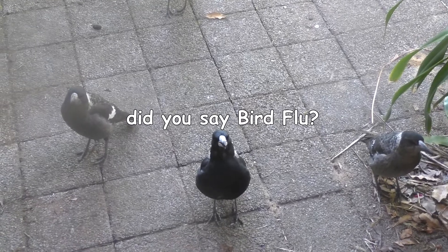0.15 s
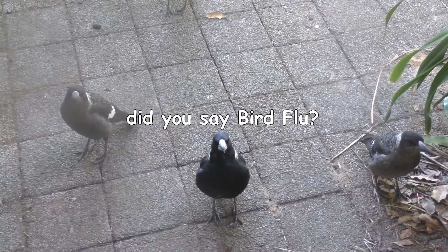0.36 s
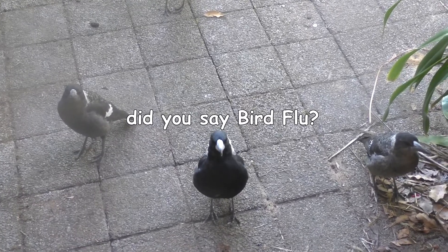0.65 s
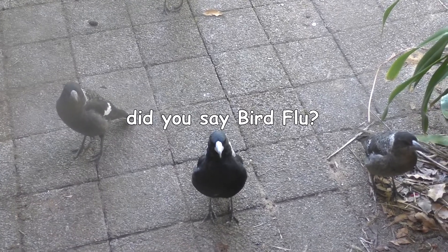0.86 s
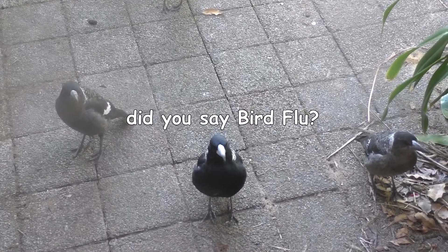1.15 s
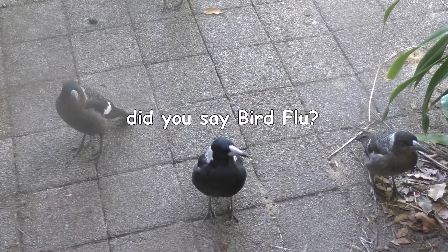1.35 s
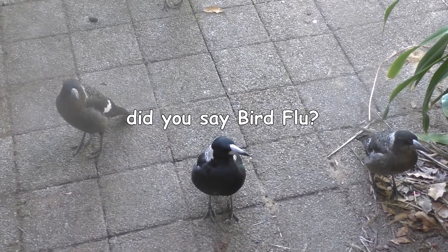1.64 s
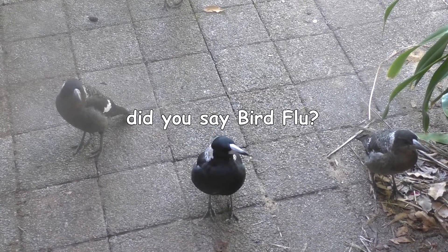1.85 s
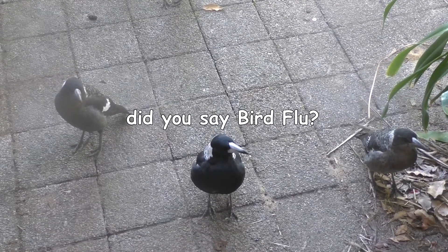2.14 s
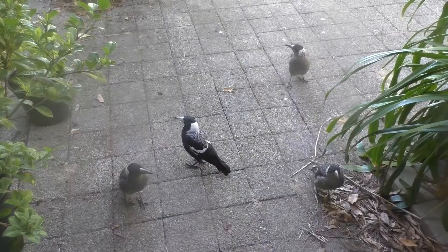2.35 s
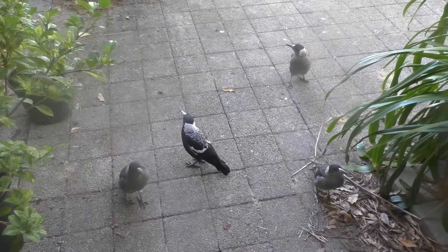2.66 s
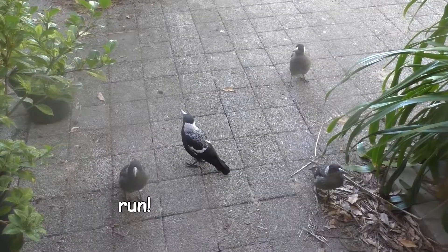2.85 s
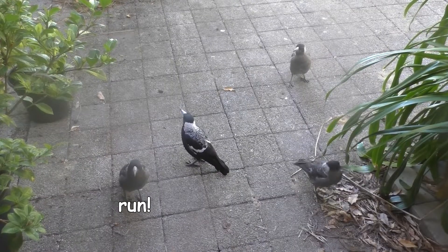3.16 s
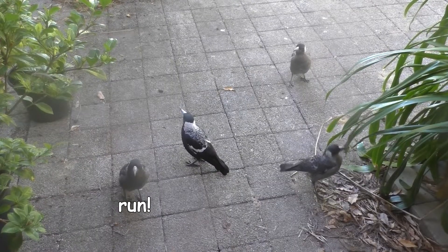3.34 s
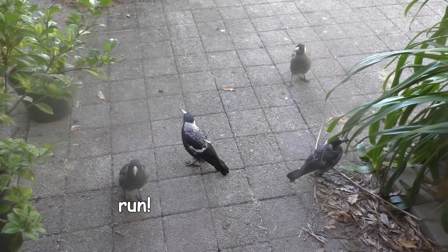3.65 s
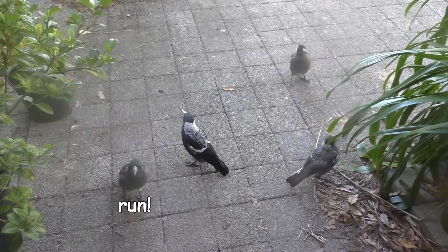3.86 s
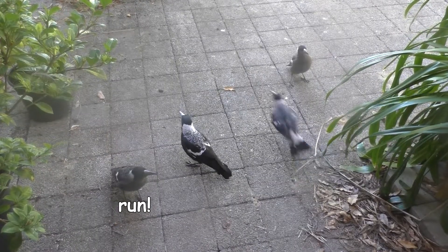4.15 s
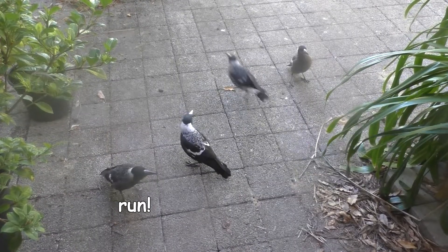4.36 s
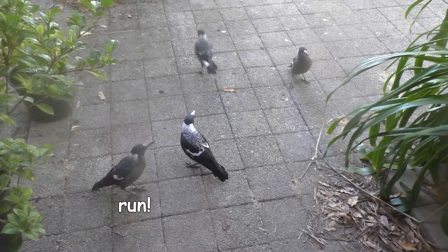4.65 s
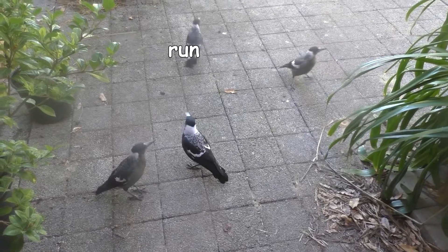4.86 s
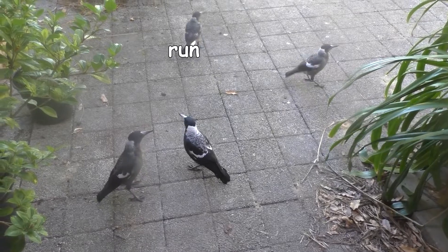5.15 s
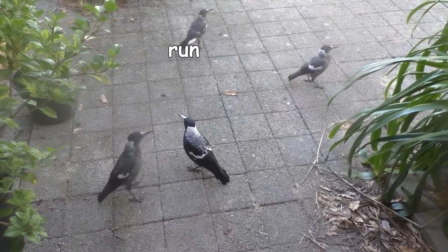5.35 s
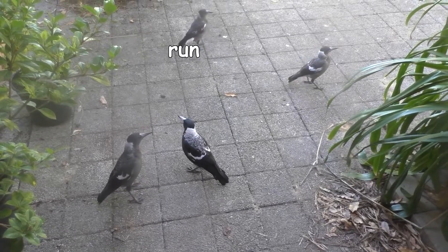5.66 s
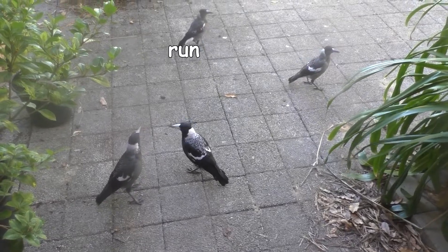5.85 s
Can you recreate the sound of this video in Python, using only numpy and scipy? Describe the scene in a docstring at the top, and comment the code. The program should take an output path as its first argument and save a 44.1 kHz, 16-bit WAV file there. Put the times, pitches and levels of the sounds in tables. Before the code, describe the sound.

Close magpie warbling and one harsh squawk give way to a steady engine rumble, with rustling leaves and fluttering wings.

```python
"""Magpies on a garden path

One magpie warbles a falling phrase, its two voices beating against each other so the notes flutter.
A harsh squawk follows, forced through an open beak. A young bird scrambles out of dry leaves and flaps
off across the pavers. Small birds whistle far off, and the garden walls echo the calls. A vehicle engine
drones nearby over distant traffic and a soft hiss; all three turn abruptly louder at 2.3 s."""
import sys
import numpy as np
from scipy import signal
from scipy.fft import rfft, irfft, next_fast_len
from scipy.io import wavfile
from scipy.ndimage import uniform_filter1d, map_coordinates

SR = 44100
rng = np.random.default_rng(int(sys.argv[2]) if len(sys.argv) > 2 else 0)


def transcribe(u):
    """Save the signal u as a 16-bit wav file named by the first command-line argument.

    u: samples, shape (n,) or (channels, n), limited to [-1, 1]; the rate is SR.
    q: integer samples, one column per channel.
    """
    v = np.clip(np.atleast_2d(u).T, -1, 1)
    q = np.round(v * 32767).astype(np.int16)
    wavfile.write(sys.argv[1], SR, q)


N = 264776
TIME = np.arange(N) / SR

# Six shapes of the throat and beak, each ringing at its own set of frequencies (resonances).
# Each row: frequency in Hz, half width in Hz, relative strength in dB.
HIGH_THROAT = [(2110, 250, -9.5), (2930, 160, -6.5), (3780, 160, -8.5), (4430, 260, 2), (5850, 150, -22),
               (7400, 92, -22), (8360, 250, -10), (10000, 560, -13), (11130, 320, -15.5), (13800, 490, -20)]
ROUND_THROAT = [(2017, 110, -17.5), (2940, 130, -15), (3600, 72, 1.5), (4960, 160, -8.5), (5610, 200, -16),
                (7400, 470, -24), (8570, 190, -13), (9580, 300, -12), (11300, 380, -16),
                (14500, 600, -28.5)]
SOFT_THROAT = [(2480, 150, -4), (4700, 380, -3), (8900, 330, -4), (12300, 480, -4), (15100, 300, -9)]
OPEN_THROAT = [(2070, 48, -5), (3170, 140, -7.5), (3700, 110, -5), (4226, 112, -16), (5150, 140, 0),
               (7254, 84, -14.5), (8350, 410, -17), (9405, 130, -5.5), (10020, 250, -10),
               (11280, 220, -5.5), (15450, 130, -18)]
MID_THROAT = [(1767, 77, -6), (2720, 127, -12), (3260, 90, -2), (3600, 130, -2.5), (5120, 200, -11),
              (7200, 340, -11), (9360, 280, -7), (11500, 460, -2.5), (12700, 220, -7), (14020, 400, -14)]
LOW_THROAT = [(1710, 85, -5), (2640, 98, -8.5), (3290, 75, 0.5), (3560, 60, -1), (6240, 70, -4),
              (8870, 170, 0.5), (10900, 130, -5), (13200, 153, -10)]
# The throat shape for each note, before the throat relaxes.
NOTE_THROATS = [HIGH_THROAT, HIGH_THROAT, ROUND_THROAT, ROUND_THROAT, SOFT_THROAT, OPEN_THROAT, MID_THROAT,
                MID_THROAT, LOW_THROAT, LOW_THROAT]
# How fast each note's resonances slide, as a share of their frequency per second.
THROAT_GLIDES = [.3, -0.26, -.6, -.4, -.3, 0.083, 0.45, -.2, -.2, -.2]
# The notes of the warble. Each row: start, crest and end in seconds; pitch in Hz at those three times;
# the whistle's crest level, rise and fall in dB; the same three for the rasp; beats per second at start
# and end; second voice's strength (0-1) at the three times; whether it lies above (1) or below (-1)
# the first; share of air noise in the rasp (0-1).
WARBLE_NOTES = [ (0, 0.042, .062, 1438, 1382, 1376, -12, 2.3, 3, -40, 11, 3, 134.3, 95.8, .15, 0.86, 1, 1, 0.73),
                (0.057, .074, .213, 1398, 1398, 1344, -18.5, 1, 22.4, -41, 3, 9.2, 68.5, 72.6, 0.91, 1, 1, 1, .8),
                (0.21, 0.263, .295, 959, 952, 953, -14.5, 14, 12, -37.5, 7.5, 10, 105.3, 108, 0.202, .19, 0.22, 1, 0.5),
                (0.293, 0.306, .332, 1020, 1043, 1066, -24.5, 2, 27, -49, 1, 19, 66.14, 75.8, 0.63, 0.77, .5, 1, .5),
                (0.486, 0.537, 0.5958, 898, 764, 673, -27.5, 22.5, 16.5, -54, 10, 11, 100.5, 48, 0.93, 0.43, 0.53, 1, 0.51),
                (.604, 0.653, 0.7056, 1009, 1015, 1020, -27.5, 12, 9.8, -37, 23, 9.9, 91.5, 102, .94, .6, 0.045, -1, 0.36),
                (0.703, .718, .735, 786, 805, 826, -33, 12, 11, -41.5, 7.3, 2, 124.6, 167, 0.8, .75, 0.52, -1, .6),
                (.731, 0.776, .909, 896.5, 881, 728, -27, 6.4, 5.7, -40, 4.1, 13, 92.1, 78.6, 0.35, .5, .9, -1, 0.56),
                (0.903, 0.916, .964, 711, 690, 666, -38, 2, 9.3, -55, 1.05, 2.9, 71, 65.5, .6, 0.42, 0.55, -1, 0.28),
                (0.958, 0.995, 1.075, 718, 702, 626, -35, 10.8, 25, -60.5, 1.94, 19, 79.3, 63.95, 0.72, 0.77, 0.94, -1, 0.48)]


def warble():
    """Clear notes step down in pitch: each swells to a crest and fades while its beating settles."""
    relax_s, sag_per_s = 0.769, 0.198  # late in the phrase the throat relaxes and its resonances sink
    phrase = np.zeros(N)
    for note, shape, glide in zip(WARBLE_NOTES, NOTE_THROATS, THROAT_GLIDES):
        times, pitches, strengths = note[:3], note[3:6], note[14:17]
        crest_db, rise_db, fall_db, rasp_crest_db, rasp_rise_db, rasp_fall_db = note[6:12]
        start_beat_hz, end_beat_hz = note[12:14]
        side, air_share = note[17:]
        start, crest, end = times

        def throat(x, t):
            """The note's own throat shape blends into the low one as the bird relaxes."""
            blend = np.pi / 2 * ramp(relax_s, 0.065, t)
            sag = 1 - sag_per_s * np.maximum(t - relax_s, 0)
            tense, low = [resonate(x, rows, scale, wander=0.0094, flicker_db=3, leak_db=-37, steep=1.18)
                          for rows, scale in ((shape, 1 + glide * (t - crest)), (LOW_THROAT, sag))]
            return np.cos(blend) * tense + np.sin(blend) * low

        t = span(start, end)
        rise_left = (1 - ramp(start, crest - start, t)) ** 1.7
        fallen = ramp(crest, end - crest, t)
        unsettled = (1 - ramp(start, end - start, t)) ** 1.5
        phrase += syrinx(
            t, np.interp(t, times, pitches), throat,
            beat_hz=end_beat_hz + (start_beat_hz - end_beat_hz) * unsettled,
            second_voice=np.interp(t, times, strengths), side=side,
            whistle_db=crest_db - rise_db * rise_left - fall_db * fallen ** 1.63,
            rasp_db=rasp_crest_db - rasp_rise_db * rise_left - rasp_fall_db * fallen ** 2.2,
            multiples=np.arange(2, 20), air_share=air_share,
            jitter=0.013, slip=0.91, smear=0.05, pinch=0.75, rasp_flutter=0.18)
    return phrase


# Resonances of the wide-open beak. Each row: frequency in Hz, half width in Hz, relative strength in dB.
OPEN_BEAK = [(1400, 250, 5), (1770, 68, 0), (2110, 140, 3), (2410, 125, 5), (3360, 160, -5), (4120, 149, 0),
             (4400, 100, -2), (5440, 270, 2.5), (6250, 360, -7), (7920, 300, 0), (10100, 400, -13),
             (11240, 400, -5.5)]
# The squawk scoops up, wavers and drops away. Each row: time in seconds, pitch in Hz.
SQUAWK_PITCH = [(1.894, 1131), (1.91, 1278), (1.95, 1400), (2.05, 1364), (2.105, 1405), (2.16, 1330),
                (2.2, 1400), (2.252, 1129)]
# Changes of effort. Each row: middle and half length in seconds, dB added to the whistle and to the rasp.
SQUAWK_PUSHES = [(1.925, .025, 2.5, 1), (2.1, .018, 4.5, 2.5), (2.16, .03, 0, -5), (2.207, .018, 5, -1.5)]


def squawk():
    """The voice, forced hard through an open beak, splits into rough tones a quarter of its pitch apart."""
    t = span(1.894, 2.252)

    def swell(attack_s, release_s):
        return ramp(t[0], attack_s, t) * (1 - ramp(t[-1] - release_s, release_s, t))

    def beak(x, t):
        follow_pitch = (pitch / np.median(pitch)) ** 0.3
        return resonate(x, OPEN_BEAK, follow_pitch, wander=0.021, flicker_db=1, leak_db=-23, steep=1.7)

    pitch = over_time(SQUAWK_PITCH, t)
    whistle_db = -40 + swell(0.5, 0.5)
    rasp_db = -51.5 + 13 * swell(0.014, 0.045)
    for middle, half_s, more_whistle_db, more_rasp_db in SQUAWK_PUSHES:
        whistle_db += more_whistle_db * bump(middle, half_s, t)
        rasp_db += more_rasp_db * bump(middle, half_s, t)
    force = swell(0.0292, 0.0292)
    return syrinx(t, pitch, beak, beat_hz=74, second_voice=0.95 * np.sqrt(force), side=1,
                  whistle_db=whistle_db, rasp_db=rasp_db, multiples=np.arange(3, 38) / 4, air_share=0.35,
                  jitter=0.04, slip=1.3, smear=0.3, pinch=0.7, rasp_flutter=0.12)


def syrinx(t, pitch, throat, beat_hz, second_voice, side, whistle_db, rasp_db, multiples, air_share,
           jitter, slip, smear, pinch, rasp_flutter):
    """A bird's voice box: two voices beat as a whistle; overtones and air rasp through the throat."""
    first, size = round(t[0] * SR), len(t)
    depth = second_voice * amp(1.18 * wobble(70, size))
    beat = side * 2 * np.pi * np.cumsum(beat_hz * (1 + 0.08 * wobble(50, size))) / SR
    pair = (1 - depth * np.exp(1j * beat)) / np.sqrt(1 + depth ** 2)
    # strong beats pinch into separate pulses of uneven size
    pulses = unit(np.abs(pair) ** (1 + pinch * depth ** 2)) * amp(1.76 * wobble(112.1, size))
    # the two voices lie either side of the pitch; deep beats let the phase slip
    hz = pitch * (1 + jitter * wobble(450, size)) - side * beat_hz * depth / (1 + depth)
    phase = 2 * np.pi * np.cumsum(hz) / SR + slip * depth * wobble(80.1, size)
    cycle = np.unwrap(np.angle(pair * np.exp(1j * phase)))
    whistle = np.sqrt(2) * pulses * np.sin(cycle)
    # every overtone swells and wavers on its own; the high ones waver most
    overtones = unit(sum(np.cos(k * cycle + smear * k * wobble(260, size)) * amp(3 * wobble(50, size))
                         for k in multiples))
    air = unit(rng.standard_normal(size) * (1 + 0.5 * np.cos(cycle)))
    buzz = np.sqrt(1 - air_share) * overtones + np.sqrt(air_share) * air
    rasp = throat(buzz, t) * unit(pulses ** rasp_flutter)
    fade = np.clip(np.minimum(t - t[0], t[-1] - t) / 0.004, 0, 1)
    voice = fade * (amp(whistle_db) * whistle + amp(rasp_db) * rasp)
    return np.pad(voice, (first, N - first - size))


def resonate(x, resonances, scale, wander, flicker_db, leak_db, steep):
    """A throat boosts sound near its wavering resonances and lets a little leak between them."""
    hz, seconds, spectrum = signal.stft(x, SR, nperseg=512, noverlap=448)
    hz = hz[:, None]
    frames = np.minimum(np.round(seconds * SR).astype(int), len(x) - 1)
    drift = lambda: wobble(45.8, len(x))[frames]
    gain = amp(leak_db) * (hz > 900) / (1 + (hz / 13000) ** 6)
    for ring_hz, width, db in resonances:
        centre = ring_hz * scale[frames] * (1 + wander * drift())
        gain = gain + amp(db + flicker_db * drift()) / (1 + ((hz - centre) / width) ** 2) ** steep
    return unit(signal.istft(spectrum * gain, SR, nperseg=512, noverlap=448)[1][:len(x)])


# The tone colours of feathers and of dry leaves. Each row: frequency in Hz, relative level in dB.
FEATHER_COLOUR = [(500, -45), (900, 0), (1400, 6), (2400, 6), (5000, 7), (7000, 3.5), (10000, 2.5),
                  (12500, -15), (15600, -33.5)]
LEAF_COLOUR = [(2000, -36), (5000, -8.5), (9000, 13.5), (13000, 10.5), (15800, -0.5)]
# The young bird's bursts of movement. Each row: peak time in seconds, seconds to rise 20 dB,
# seconds to fall 20 dB, feather level in dB, leaf level in dB.
FLURRIES = [(3.51, 0.36, 0.44, -61, -49), (3.62, 0.073, 0.32, -47.5, -58),
            (3.925, 0.37, 0.55, -37.5, -48.5), (4.12, 0.21, 0.23, -42, -41.5), (4.32, 0.16, 0.24, -44, -69),
            (4.56, 0.49, 2.4, -46.5, -58), (5.765, 0.141, 0.55, -42, -70)]
# Leaves snapping underfoot. Each row: start in seconds, level in dB, seconds to fade 60 dB,
# frequency in Hz below which the snap is weakened.
LEAF_SNAPS = [(3.2988, -32, 0.02, 10000), (3.357, -38, .012, 9000), (3.3854, -38.5, .04, 8000),
              (3.449, -38, .06, 9000), (3.5047, -30, .034, 7500), (3.603, -35.5, 0.076, 8000),
              (3.922, -33, .05, 7000), (4.09, -30, 0.023, 7000), (4.119, -32, .04, 6000),
              (4.146, -29.5, .025, 9000), (4.303, -35, .018, 11000)]


def scramble():
    """Feathers swish and dry leaves snap and crackle as a bird takes off."""
    def crackle(size):
        return coloured(rng.standard_normal(size) * amp(3.2 * wobble(1500, size)), LEAF_COLOUR)

    wing_gain, leaf_gain = np.zeros(N), np.zeros(N)
    for peak, rise, fall, feathers_db, leaves_db in FLURRIES:
        shape_db = -20 * np.maximum((peak - TIME) / rise, (TIME - peak) / fall)
        wing_gain = np.hypot(wing_gain, amp(feathers_db + shape_db))
        leaf_gain = np.hypot(leaf_gain, amp(leaves_db + shape_db))
    swish = wing_gain * amp(1.6 * wobble(25)) * rush(FEATHER_COLOUR, patchy_db=3)
    leaves = leaf_gain * amp(1.3 * wobble(90)) * crackle(N)
    age = TIME[:SR // 10]
    attack = 1 - np.exp(-age / 0.00077)
    for start, db, fade_s, low_hz in LEAF_SNAPS:
        snap = unit(filtered(crackle(len(age)), lambda hz: hz ** 4 / (hz ** 4 + low_hz ** 4)))
        leaves[round(start * SR):][:len(age)] += attack * amp(db - 60 * age / fade_s) * snap
    return swish + leaves


LOUDER_S = 2.302  # when the drone and the background step up in level
# How fast the engine runs. Each row: time in seconds, working cycles per second.
ENGINE_SPEED = [(1, 35.5), (2.3, 34.6), (2.5, 35), (2.8, 36), (3.1, 37.5), (3.45, 37.8), (3.9, 37.1),
                (4.3, 36.4), (4.66, 36), (5.3, 35.9), (6, 36)]
# The exhaust's tones. Each row: multiple of the engine speed, relative level in dB before and after the
# step up, dB added (after it) for each cycle per second above cruising speed.
EXHAUST_TONES = [(3, -16.5, -14.5, 2.5), (4, -15.5, -7.5, 0.64), (5, -34, -3, -1.27), (7, -16.5, -15.5, 3),
                 (8, -14.5, -12, -1)]
# The strongest tone sinks away twice. Each row: middle and half length in seconds, drop in dB.
BOOM_DIPS = [(2.55, .45, 6), (4.23, .14, 14)]
# The rumble's tone colour before and after the step up. Each row: frequency in Hz, relative level in dB.
RUMBLE_BEFORE = [(12, -75.5), (20, -45), (48, -8.5), (75, -14.5), (104, -1.5), (182, 0), (286, -3.5),
                 (392, -7), (492, -26), (600, -30), (780, -63), (1320, -120)]
RUMBLE_AFTER = [(15, -60), (25, -25), (54, -23.5), (112, -7), (162, -2.5), (226, -6), (265, -3),
                (286, -6.5), (370, -13.5), (435, -38), (480, -71), (620, -72.5), (1060, -120)]


def engine():
    """Exhaust tones follow the engine's speed over a lumpy rumble; it pulls, then settles."""
    cruise_hz, boom_multiple = 36.02, 5
    speed, after = over_time(ENGINE_SPEED), step_up()
    pull = after * (speed - cruise_hz)
    surge_db = 4.2 * after * np.exp(-np.abs(TIME - LOUDER_S) / 0.22)  # loudest right at the step up
    level_db = background_db(before_db=-39, after_db=-32) + 0.5 * pull + surge_db
    dip_db = sum(db * bump(middle, half_s) for middle, half_s, db in BOOM_DIPS)
    cycle = 2 * np.pi * np.cumsum(speed) / SR
    tones = np.zeros(N)
    for multiple, before_db, after_db, pull_db in EXHAUST_TONES:
        db = before_db + (after_db - before_db) * after + pull_db * pull
        gain = amp(db - dip_db * (multiple == boom_multiple) + 1.2 * wobble(6.4))
        phase = multiple * cycle + 0.34 * wobble(11) + rng.uniform(0, 2 * np.pi)
        tones += gain * np.sqrt(2) * np.sin(phase)
    rumble = after * amp(-4) * rush(RUMBLE_AFTER, patchy_db=3)
    rumble += (1 - after) * amp(-3) * rush(RUMBLE_BEFORE, patchy_db=2)
    return amp(level_db) * (tones + rumble * (1 + 0.24 * np.cos(cycle)))


def thump():
    """A soft low thump as the background suddenly gets louder."""
    age = np.maximum(TIME - LOUDER_S, 0)
    return -amp(-35 - 60 * age / 0.057) * np.sin(2 * np.pi * 45 * age)


# Small birds' calls. Each row: start and length in seconds, first and last pitch in Hz, level in dB,
# waver as a share of the pitch.
CHIRPS = [(1.321, 0.15, 5850, 6230, -57.5, 0.082), (1.437, 0.234, 4310, 4430, -54.5, 0.037),
          (3.706, 0.08, 1362, 1364, -50.5, 0.028), (3.947, 0.068, 1354, 1368, -48.5, 0.0325),
          (4.617, 0.14, 3158, 3190, -50, 0.0118)]


def small_birds():
    """Faint whistles from elsewhere in the garden, made hoarse by a fast waver in pitch."""
    song = np.zeros(N)
    for start, length, start_hz, end_hz, db, waver in CHIRPS:
        progress = ramp(start, length)
        pitch = (start_hz + progress * (end_hz - start_hz)) * (1 + waver * wobble(500))
        song += amp(db) * np.sin(np.pi * progress) * np.sin(2 * np.pi * np.cumsum(pitch) / SR)
    return song


# The tone colours of the traffic and the hiss. Each row: frequency in Hz, relative level in dB.
TRAFFIC_COLOUR = [(260, -36), (450, -16.5), (705, -1.5), (840, -12), (1000, -7), (1450, -11), (1600, -18.5),
                  (2000, -14), (2600, -59), (4400, -120)]
HISS_COLOUR = [(1180, -16), (2000, -0.5), (2380, 3.5), (2920, 1.5), (3240, -1.5), (3650, 1), (4120, -2),
               (4560, 0.5), (5660, -4.5), (9890, -2), (15600, -15)]


def traffic_and_hiss():
    """Distant traffic and a soft hiss, both slowly growing after the step up."""
    seconds_after = np.maximum(TIME - LOUDER_S, 0)
    traffic_db = background_db(before_db=-52.5, after_db=-49) + 0.22 * seconds_after
    hiss_db = background_db(before_db=-53.5, after_db=-50.5) + 0.45 * seconds_after
    traffic = amp(traffic_db) * rush(TRAFFIC_COLOUR, patchy_db=2)
    return traffic + amp(hiss_db) * rush(HISS_COLOUR, patchy_db=2.7)


# How long the echo lasts. Each row: frequency in Hz, seconds to fade 60 dB.
ECHO_FADES = [(200, 0.22), (1000, 0.55), (4000, 0.11), (12000, 0.056)]


def wall_echo(x):
    """The walls round the garden answer, the treble dying first."""
    hz, t, noise = signal.stft(rng.standard_normal(SR // 2), SR, nperseg=256)
    decay = amp(-60 * t / over_frequency(ECHO_FADES, hz)[:, None])
    tail = signal.istft(noise * decay, SR, nperseg=256)[1]
    delayed = np.pad(x, (int(0.0095 * SR), 0))
    return signal.fftconvolve(delayed, tail / np.linalg.norm(tail))[:N]


def background_db(before_db, after_db):
    """A background layer starts hushed, swells to before_db, then steps up to after_db."""
    hush_db = 9 * (1 - ramp(0.97, 0.73))
    return before_db - hush_db + (after_db - before_db) * step_up()


def step_up():
    """0 before the background turns abruptly louder, 1 after."""
    return ramp(LOUDER_S - 0.01, 0.02)


def rush(colour, patchy_db):
    """Noise with a tone colour and drifting louder and softer patches."""
    spectrum = signal.stft(rng.standard_normal(N), nperseg=512)[2]
    patches = uniform_filter1d(rng.standard_normal(spectrum.shape), size=6, axis=0)
    patches = unit(uniform_filter1d(patches, size=16, axis=1))
    return coloured(signal.istft(spectrum * amp(patchy_db * patches), nperseg=512)[1][:N], colour)


def coloured(x, colour):
    """Give x a tone colour of (Hz, dB) points, at an average strength of 1."""
    return unit(filtered(x, lambda hz: amp(over_frequency(colour, hz))))


def filtered(x, response):
    """Turn each frequency in x up or down by response(hz)."""
    size = next_fast_len(len(x) + 8192)
    return irfft(rfft(x, size) * response(np.fft.rfftfreq(size, 1 / SR)), size)[:len(x)]


def wobble(rate, size=N):
    """A smooth curve through `rate` random values a second."""
    knots = rng.standard_normal(int(size * rate / SR) + 4)
    return map_coordinates(knots, [np.arange(size) * rate / SR])


def over_frequency(points, hz):
    """Join (Hz, value) points with straight lines on a scale of octaves."""
    point_hz, values = np.transpose(points)
    return np.interp(np.log(hz + 1), np.log(point_hz + 1), values)


def over_time(points, t=TIME):
    """Join (seconds, value) points with straight lines."""
    return np.interp(t, *np.transpose(points))


def ramp(start, length, t=TIME):
    """Progress from 0 to 1 over length seconds."""
    return np.clip((t - start) / length, 0, 1)


def bump(middle, half_s, t=TIME):
    """A smooth hill of height 1."""
    return np.exp(-((t - middle) / half_s) ** 2)


def span(start, end):
    """The instants between two times."""
    return TIME[int(start * SR):int(end * SR)]


def amp(db):
    """Decibels to gain."""
    return 10 ** (np.asarray(db) / 20)


def unit(x):
    """Scale x to an average strength (rms) of 1."""
    return x / np.sqrt(np.mean(x ** 2) + 1e-20)


def scene():
    """Magpies in front, with small birds, the engine and the traffic behind them."""
    magpies, distant = warble() + squawk(), small_birds()
    echo = wall_echo(amp(-25) * magpies + distant)
    return (magpies + distant + echo + scramble() + engine() + thump() + traffic_and_hiss())[None]


def record(dry):
    """Cut away the very highest treble."""
    return filtered(dry[0], lambda hz: hz < 15780)[None]


dry = scene()
out = record(dry)
transcribe(out)
```